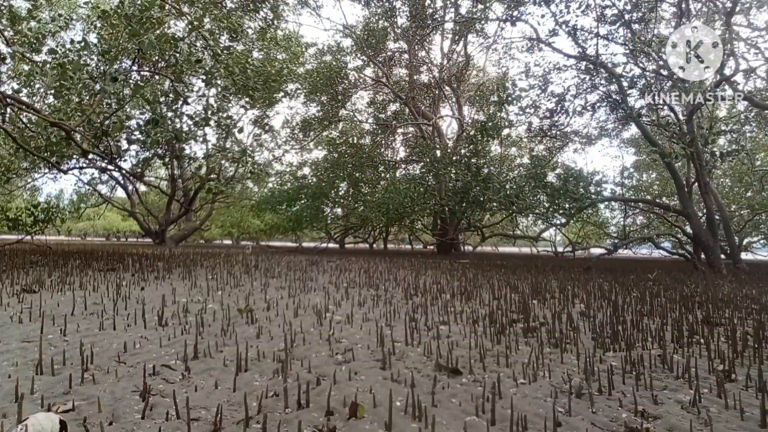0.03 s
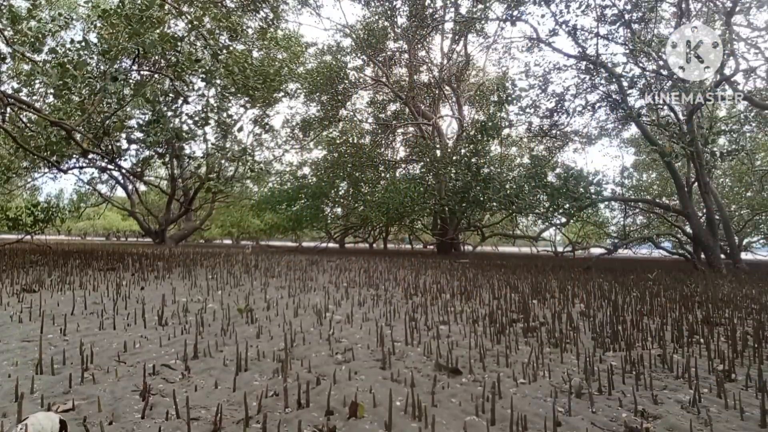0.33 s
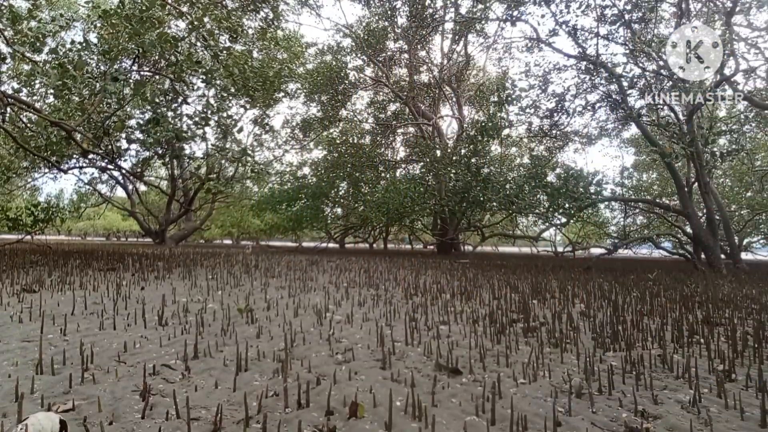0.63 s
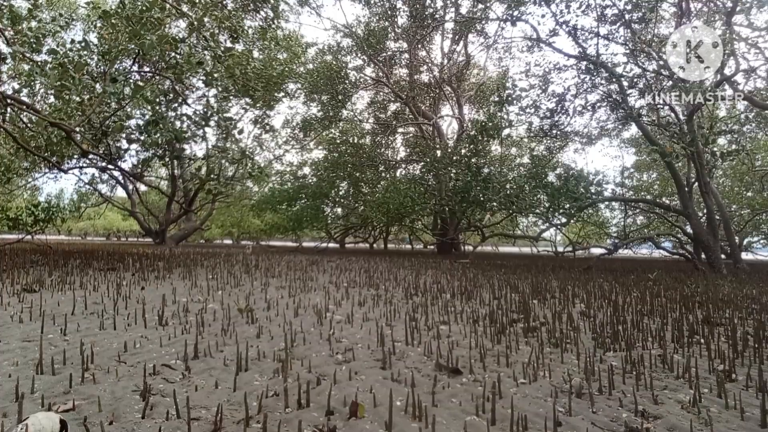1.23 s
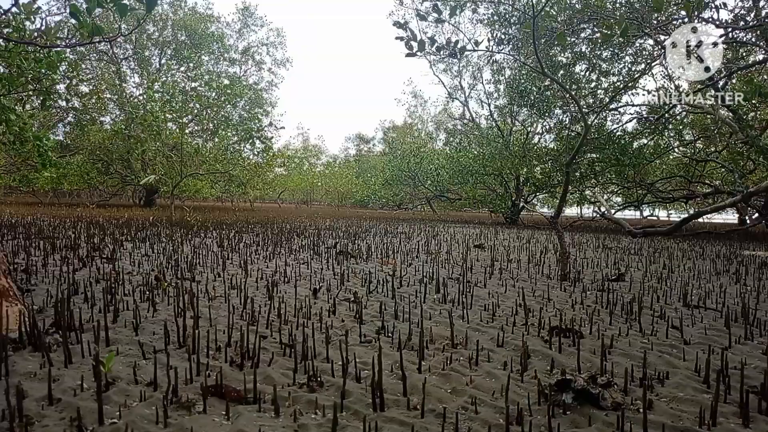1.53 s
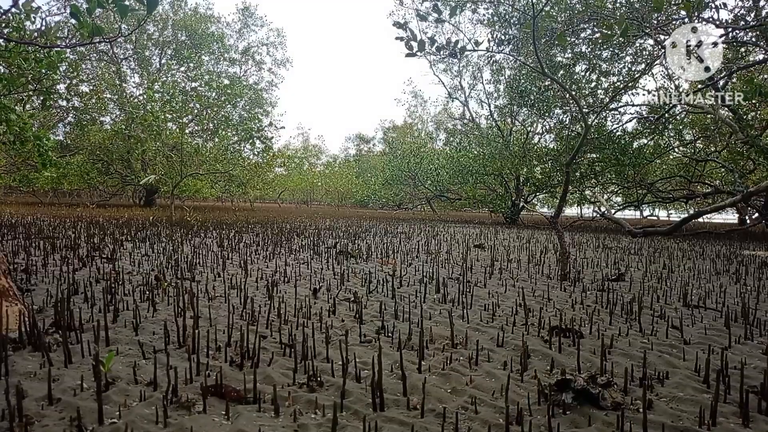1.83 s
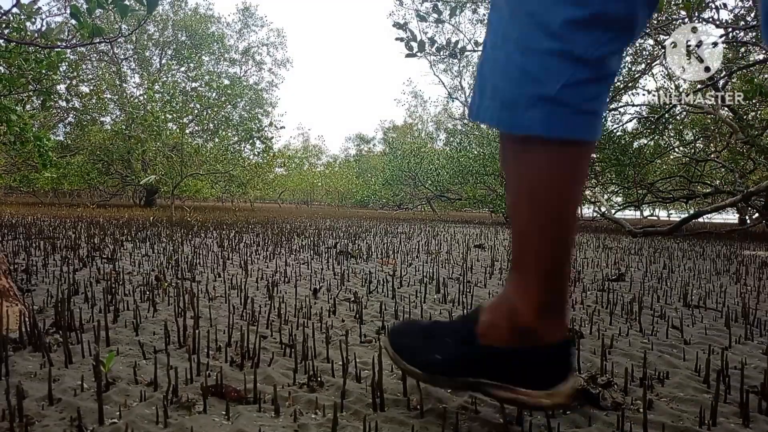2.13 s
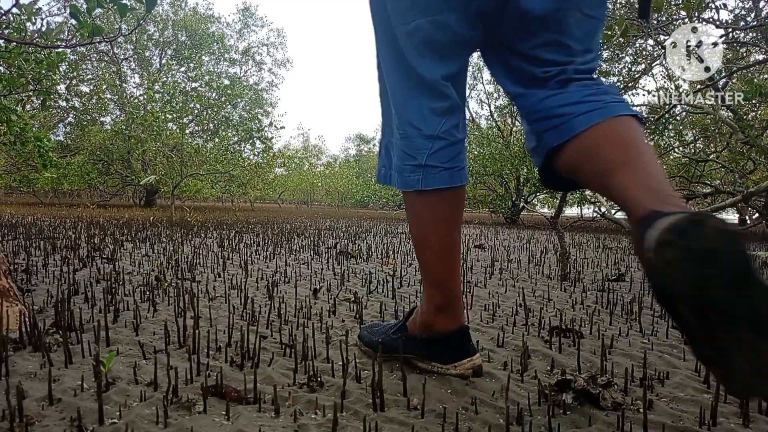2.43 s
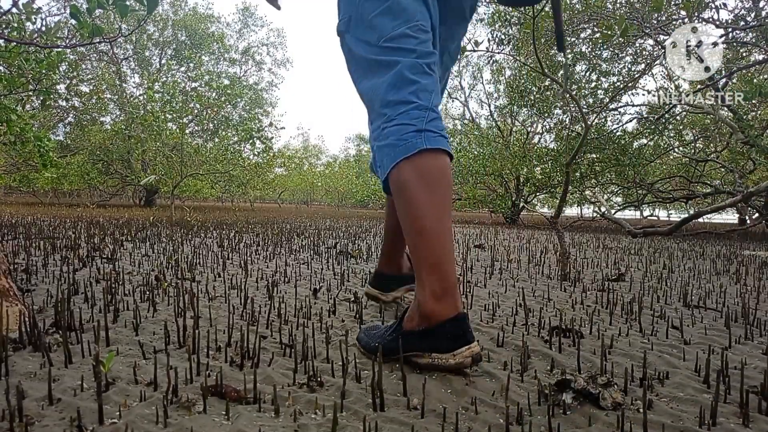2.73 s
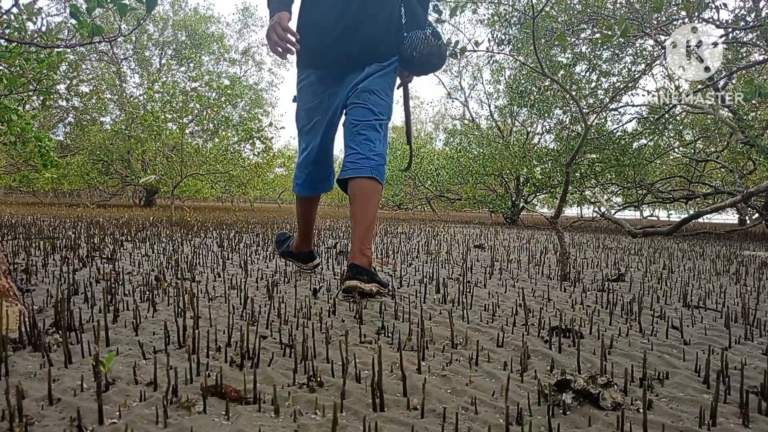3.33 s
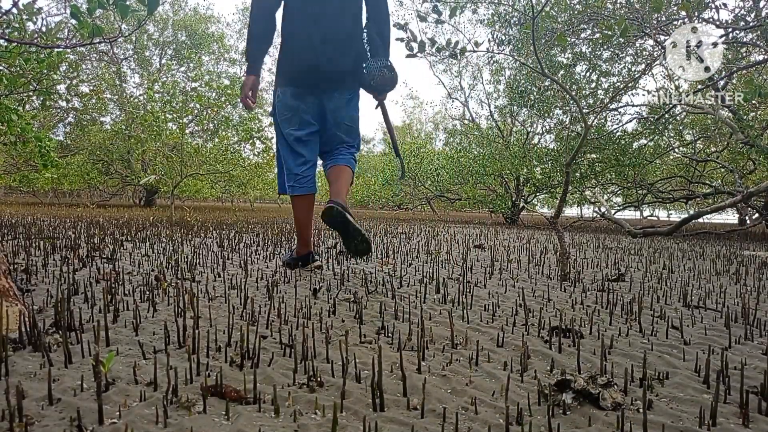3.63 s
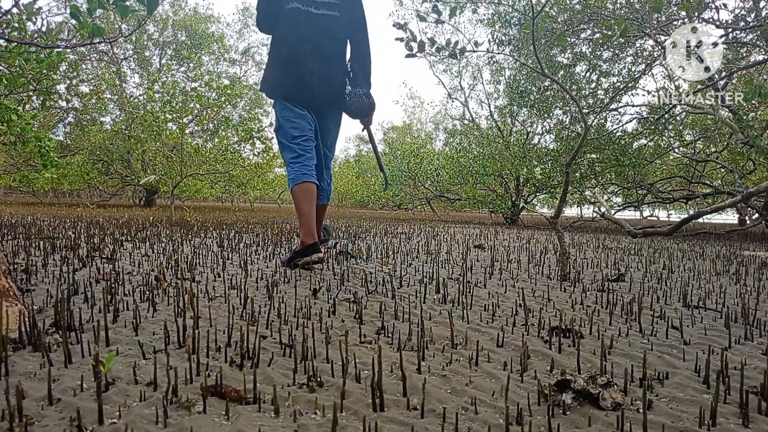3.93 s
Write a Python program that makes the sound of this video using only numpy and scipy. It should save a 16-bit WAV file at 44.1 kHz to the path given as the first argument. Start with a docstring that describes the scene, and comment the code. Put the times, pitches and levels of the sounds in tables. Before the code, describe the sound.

Footsteps crunch over gritty mud and recede, while light wind and a far engine rumble.

```python
"""A mangrove flat, with footsteps on wet sandy mud, first close by and then walking away.
Each sole crushes grit and sand, snaps small roots and shells and lands with a soft thud; water
fizzes back into the footprints. Low buffets and light wind reach the microphone, the firings of a
far boat engine ring its exhaust, and small birds call faintly over the hiss of open air.
The whole sound fades out briefly at about 1.6 s and returns."""
import sys
import numpy as np
from scipy import signal
from scipy.fft import rfft, irfft
from scipy.io import wavfile

SR = 44100
rng = np.random.default_rng(int(sys.argv[2]) if len(sys.argv) > 2 else 0)


def wav_out(sig):
    """Save sig, one row per channel (or a flat mono array), as 16-bit PCM at SR to the path in sys.argv[1]."""
    wavfile.write(sys.argv[1], SR, np.round(np.clip(np.atleast_2d(sig).T, -1, 1) * 32767).astype(np.int16))


N = 176400
TIME = np.arange(N) / SR


# Spectra of coarse grit and fine sand. Each row: frequency in Hz, relative spectral density in dB.
GRIT_SPECTRUM = [(200, -19.5), (400, -4.5), (700, 4), (1200, -2), (2000, -6.5), (3200, -11.5), (5000, -25),
                 (9000, -35)]
SAND_SPECTRUM = [(2000, 0.5), (3500, 6), (5500, -2.5), (8000, -6.5), (11000, -7), (16000, -11)]
# A sole presses, rolls or peels off. Each row: start in seconds, length in seconds, level in dB,
# boost of the sand in dB, pitch of the squelch in Hz.
SOLE_CONTACTS = [(0.018, 0.1, -57.5, -2.5, 2460), (0.13, .026, -48.5, -1, 1880),
                 (0.192, 0.015, -40.5, 4.5, 746), (0.243, 0.063, -43, -0.5, 785),
                 (0.306, 0.0092, -32.5, -4, 664), (0.329, 0.06, -35.5, 3.5, 2090),
                 (0.406, 0.034, -44, 1.5, 880), (0.451, 0.027, -43, -6.5, 2840),
                 (0.487, 0.042, -32.5, -2, 1700), (0.545, 0.017, -37, 6.5, 1650),
                 (0.603, 0.018, -59.5, 14, 1500), (1.711, 0.18, -52, 3, 1640),
                 (1.833, 0.039, -40.5, -9, 750), (1.887, 0.082, -47.5, 5, 1790),
                 (2.021, 0.011, -52, 6, 1760), (2.054, 0.12, -61.5, 1, 2040),
                 (2.172, 0.037, -38.5, -9, 1800), (2.247, 0.04, -40.5, 0, 1030),
                 (2.308, 0.042, -49.5, 4.5, 2160), (2.364, .04, -44.5, 1.5, 2260),
                 (2.409, 0.079, -49, 1.5, 1810), (2.506, 0.027, -41, -6, 724),
                 (2.557, 0.035, -77, -2.5, 1800), (2.764, 0.058, -44.5, -6, 900),
                 (2.829, 0.035, -44.5, -4.5, 860), (2.862, 0.075, -51, -2, 1150),
                 (2.975, 0.048, -45.5, -1.5, 1500), (3.035, 0.062, -48.5, 0.5, 2720),
                 (3.189, 0.026, -59, -6, 1820), (3.364, 0.15, -60, 6.5, 875), (3.401, 0.027, -38, -20, 725),
                 (3.546, 0.059, -52.5, 0, 2060), (3.672, .016, -58, 4, 1780),
                 (3.876, .027, -46.5, -4.5, 720), (3.928, 0.085, -57, 8, 1420)]

def crunches(rise_s=0.0062, decay_s=0.0087):
    """Granular fracture: grit and sand give way under load, and the wet pocket beneath resonates."""
    grit = grains(GRIT_SPECTRUM, per_s=2000, spread_db=3.5)
    sand = from_db(-9.5) * grains(SAND_SPECTRUM, per_s=7000, spread_db=1)
    out = np.zeros(N)
    for start, length, db, sand_db, hz in SOLE_CONTACTS:
        time_constants = np.maximum((start - TIME) / rise_s, (TIME - start - length) / decay_s)
        load = np.exp(-np.clip(time_constants, 0, 20))
        squelch = from_db(-9) * unit_rms(band(grit, hz, edge_ratio=1.22))
        out += from_db(db) * load * (unit_rms(grit + squelch) + from_db(sand_db) * sand)
    return out


def grains(spectrum, per_s, spread_db, clump_db=2, clump_hz=53):
    """Shot noise: tiny random fractures each ring briefly, and those of like pitch swell in clumps."""
    pitches = np.geomspace(spectrum[0][0], spectrum[-1][0], num=12)
    sizes = from_db(spread_db * np.minimum(rng.exponential(1, N), 3.3)) * rng.choice([-1, 1], N)
    clicks = sizes * (rng.random(N) < per_s / SR)
    pitch_index = rng.integers(0, len(pitches), N)
    out = np.zeros(N)
    for k, hz in enumerate(pitches):
        clumps = from_db(clump_db * wander(clump_hz))
        rings = band(clicks * clumps * (pitch_index == k), hz, edge_ratio=1.244)
        out += gain_at(spectrum, hz) * np.sqrt(hz) * unit_rms(rings)   # higher bands are wider
    return unit_rms(out)


# A root or shell breaks; the row at 1.3131 s is the break just before it, thrown back by the ground. Each row:
# start in seconds, peak of the body in dB, pitch in Hz, peak of the tick relative to the body in dB.
BREAKS = [(0.023, -41, 1220, -22), (.0445, -29, 1330, -13.5), (.148, -28, 1300, -6.5),
          (0.227, -36, 2500, 5.5), (0.247, -29, 1490, -16), (.264, -26, 1370, -10), (.311, -17, 1550, -15),
          (.319, -24, 1190, -19), (.386, -18.5, 990, -14.5), (.401, -19, 1120, -21), (.427, -21, 920, -23),
          (0.485, -33, 1600, -21), (0.505, -19.5, 1320, -10), (.776, -55.5, 9000, 15.5),
          (.903, -50, 8000, 4.5), (1.3119, -28, 2160, -17), (1.3131, -32, 1130, -27),
          (1.338, -46, 2000, -15), (1.387, -43.5, 3000, -10), (1.8329, -19.5, 970, -11),
          (1.8374, -15.5, 970, -13), (1.8469, -17.5, 1300, -7.5), (1.8522, -19, 1160, -15),
          (1.8576, -34, 1600, -14), (1.8765, -21, 1150, -6), (1.9274, -23.5, 1690, -9),
          (2.179, -18, 1570, -17), (2.199, -31.5, 1460, -2), (2.2305, -32, 2200, -18),
          (2.247, -19, 1400, -14), (2.2735, -21, 1900, -10), (2.3674, -24.5, 1770, -20),
          (2.451, -28.5, 1440, -14), (2.518, -27.5, 1090, -24), (2.532, -27.5, 1380, -17),
          (2.631, -31.5, 920, -35), (2.648, -43, 2470, 0), (2.756, -26.5, 1140, -18),
          (2.824, -24, 1030, -12.5), (2.9265, -30.5, 1930, -12), (2.976, -39.5, 2020, 0),
          (3.064, -30, 1760, -11.5), (3.275, -39, 2000, -28), (3.294, -36, 1180, -11.5),
          (3.35, -38, 1810, -25), (3.3996, -28, 720, -32), (3.42, -26, 1840, -24), (3.4224, -22, 1410, -25),
          (3.4253, -22.5, 1270, -28), (3.4291, -23.5, 1530, -18), (3.525, -34, 4200, -22),
          (3.894, -35, 1700, -26), (3.943, -28, 1730, -14.5)]

def snaps(tick_decay_s=0.0015):
    """Brittle fracture: sudden release gives one heavily damped swing with a bright tick on top."""
    out, t = np.zeros(N), TIME[:SR // 50]
    impulse = 1. * (t == 0)
    for start, db, hz, tick_db in BREAKS:
        body = butter(band(impulse, hz, edge_ratio=1.81), 1.7 * hz, "low")
        tick = butter(rng.standard_normal(len(t)), 4500, "high") * np.exp(-t / tick_decay_s)
        add(out, start, from_db(db) * (unit_peak(body) + from_db(tick_db) * unit_peak(tick)))
    return out


def scatter(steps, t60_s=0.29):
    """Diffuse reflection: roots and trees throw back a thin, dull, exponentially dying tail."""
    tail = butter(rng.standard_normal(SR), 4000, "low") * from_db(-60 * TIME[:SR] / t60_s)
    return from_db(-17.5) * signal.fftconvolve(steps, tail / np.linalg.norm(tail))[:N]


# Body weight lands on the mud, and buffets bump the microphone.
# Each row: centre in seconds, half-width in seconds, peak in dB, pitch in Hz.
WEIGHT_THUDS = [(.31, 0.015, -30, 235), (1.80, 0.016, -38, 82), (1.915, 0.011, -33, 90),
                (1.975, 0.013, -38, 86.6), (2.385, 0.015, -51.5, 75), (2.84, 0.027, -40.5, 191.9),
                (3.57, 0.043, -50, 76.4)]
MICROPHONE_BUFFETS = [(.015, 0.009, -29.5, 121), (.052, 0.013, -26, 115), (.077, 0.0086, -21.5, 115),
                      (.199, 0.0078, -20.5, 135), (.223, 0.0093, -18, 105), (.25, 0.023, -29, 130),
                      (.459, 0.014, -19, 105), (.51, 0.011, -23.5, 170), (.526, 0.012, -23.5, 105),
                      (.565, 0.008, -24.5, 110), (.61, 0.0094, -19, 105), (.72, 0.0077, -24.5, 125),
                      (.745, 0.028, -35.5, 80), (.89, 0.012, -18, 85), (.897, 0.013, -22.5, 150),
                      (.96, 0.013, -33.5, 105), (1.247, 0.018, -26.5, 90), (1.435, 0.0077, -31, 115)]

def low_bumps(pulses):
    """Wave packets: a thud or buffet is a few uneven low swings of pressure that swell and die."""
    out = np.zeros(N)
    uneven_time = np.cumsum(1 + 0.2436 * wander(122.7)) / SR
    for centre, half_width, db, hz in pulses:
        swings = np.sin(2 * np.pi * (hz * uneven_time + rng.random()))
        out += from_db(db) * swell(centre, half_width) * swings
    return butter(out, 39, "high")


# The mud ticks as it settles. Each row: time in seconds, level in dB.
SETTLING_LEVEL = [(0, -70.5), (.65, -74), (.9, -71), (1.1, -74.5), (1.5, -86), (1.8, -72), (2.6, -80.5),
                  (3.2, -74), (4, -77)]
# Water refills a footprint. Each row: centre in seconds, half-width in seconds, pitch in Hz, level in dB.
FOOTPRINT_SEEPS = [(0.67, 0.044, 1960, -60.5), (0.724, 0.077, 3510, -70.5), (.87, .055, 3180, -64.5),
                   (.88, 0.056, 3950, -69), (0.97, 0.11, 3560, -70.5)]

def wet_mud():
    """Shot noise and narrow-band noise: settling mud ticks sparsely and seeping water fizzes."""
    out = gain_curve(SETTLING_LEVEL) * grains(SAND_SPECTRUM, per_s=550, spread_db=5)
    white = rng.standard_normal(N)
    for centre, half_width, hz, db in FOOTPRINT_SEEPS:
        fizz = unit_rms(band(white, hz, edge_ratio=1.044))
        out += from_db(db) * swell(centre, half_width) * fizz
    return out


# Engine speed. Each row: time in seconds, firings per second.
FIRING_RATE = [(0, 26.2), (1.6, 26.2), (1.7, 26.7), (3.35, 26.7), (4, 26.2)]
# The puff of one firing. Each row: frequency in Hz, relative spectral density in dB.
PUFF_SPECTRUM = [(60, -18), (130, -6), (220, -7), (330, -0.5), (520, -10), (800, -12.5), (1500, -34),
                 (4000, -32), (8000, -66)]
# Exhaust resonances. Each row: frequency in Hz, drive in dB, time to fall by 60 dB in seconds.
EXHAUST_MODES = [(112, -53.5, 0.046), (150, -39.5, .1), (185, -49.5, 0.085), (287.3, -43, 0.095),
                 (338.2, -47.5, 0.099), (490, -48.5, 0.11)]
# The engine grows louder and softer. Each row: time in seconds, gain in dB.
ENGINE_GAIN = [(0, 0), (1.0, -2), (1.5, -3), (1.8, -1.5), (2.4, 2.5), (3.2, 1), (4, -2.5)]

def boat_engine(jitter_s=0.0003, spread_db=1.3, puff_decay_s=0.015):
    """Impulse excitation: each firing sends out a pressure swing and a puff, and rings the exhaust."""
    cycles = np.cumsum(np.interp(TIME, *np.transpose(FIRING_RATE))) / SR
    firings = np.zeros(N)
    for start in 0.036 + np.interp(np.arange(int(cycles[-1])), cycles, TIME):
        add(firings, start + jitter_s * rng.normal(), from_db([spread_db * rng.normal()]))
    chuff = butter(butter(firings, [90, 345], "band"), 476, "low")
    puff_envelope = signal.lfilter([1], [1, -np.exp(-1 / (puff_decay_s * SR))], firings)
    out = from_db(-36.5) * unit_peak(chuff) + from_db(-46.5) * noise(PUFF_SPECTRUM) * puff_envelope
    for hz, db, t60 in EXHAUST_MODES:
        radius, angle = from_db(-60 / (t60 * SR)), 2 * np.pi * hz / SR
        drive = firings * from_db(db + spread_db * rng.standard_normal(N))
        out += signal.lfilter([.5, 0, -.5], [1, -2 * radius * np.cos(angle), radius ** 2], drive)
    out = butter(out, 70, "high")
    muffled = butter(butter(out, 774, "low"), 950, "low")
    return gain_curve(ENGINE_GAIN) * muffled


# Bird calls. Each row: start in seconds, length in seconds, first and last pitch in Hz, peak in dB.
WHISTLES = [(1.11, 0.031, 7300, 6800, -78), (1.235, .04, 7300, 7200, -87), (1.435, 0.021, 7400, 7100, -75),
            (3.638, .2, 5600, 6100, -69.5), (3.707, 0.17, 6400, 6730, -75)]

def birds():
    """Frequency modulation: each far whistle is a thin tone that glides and wavers at random."""
    out = np.zeros(N)
    waver_hz = 254 * wander(cutoff_hz=500)
    for start, length, first_hz, last_hz, db in WHISTLES:
        progress = np.clip((TIME - start) / length, 0, 1)
        pitch = first_hz + (last_hz - first_hz) * progress + waver_hz
        envelope = np.sqrt(abs(np.sin(np.pi * progress)))
        out += from_db(db) * envelope * np.sin(2 * np.pi * np.cumsum(pitch) / SR)
    return out


# Spectra of the wind and the open air. Each row: frequency in Hz, relative spectral density in dB.
WIND_SPECTRUM = [(20, -38), (40, -24), (70, -4), (130, 1.5), (250, -7.5), (500, -18.5), (1500, -41),
                 (4000, -76.5)]
AIR_SPECTRUM = [(100, -2.5), (600, 3), (1200, -3), (2500, -10.5), (4000, -15.5), (6000, -23.5),
                (10000, -29), (16000, -27.5)]
# Their slow rise and fall. Each row: time in seconds, gain in dB.
WIND_GAIN = [(0, 3), (.9, -0.5), (1.5, -1.5), (2.0, 1), (2.4, -2.5), (2.7, -3.5), (3.3, -1.5), (3.55, 1),
             (4, 0.5)]
AIR_GAIN = [(0, 5.5), (1.5, -3.5), (2.1, 1.5), (3.2, 1), (3.8, -2.5)]

def wind_and_air():
    """Broadband noise: light wind rumbles on the microphone over the faint hiss of open air."""
    rumble = from_db(-43.5) * gain_curve(WIND_GAIN) * noise(WIND_SPECTRUM)
    hiss = from_db(-59) * gain_curve(AIR_GAIN) * noise(AIR_SPECTRUM)
    return rumble + hiss


def from_db(db):
    """Decibels as an amplitude ratio."""
    return 10 ** (np.asarray(db) / 20)


def unit_rms(x):
    """Normalisation to unit power."""
    return x / np.sqrt(np.mean(x ** 2) + 1e-20)


def unit_peak(x):
    """Normalisation to a peak of one."""
    return x / abs(x).max()


def gain_curve(rows):
    """Gain at every sample, interpolated in decibels."""
    return from_db(np.interp(TIME, *np.transpose(rows)))


def gain_at(spectrum, hz):
    """Gain of a spectrum, interpolated on a log-frequency axis."""
    frequencies, db = np.transpose(spectrum)
    return from_db(np.interp(np.log(hz + 1), np.log(frequencies), db))


def butter(x, hz, kind):
    """Second-order Butterworth filter."""
    sections = signal.butter(2, np.clip(hz, 10, .48 * SR), kind, fs=SR, output="sos")
    return signal.sosfilt(sections, x + 1e-18)


def band(x, hz, edge_ratio):
    """Band-pass filter about a geometric centre."""
    return butter(x, [hz / edge_ratio, hz * edge_ratio], "band")


def noise(spectrum):
    """Spectrally shaped noise of unit power."""
    gains = gain_at(spectrum, np.fft.rfftfreq(N, 1 / SR))
    return unit_rms(irfft(rfft(rng.standard_normal(N)) * gains, N))


def wander(cutoff_hz):
    """Low-pass random fluctuation of unit power."""
    return unit_rms(butter(rng.standard_normal(N), cutoff_hz, "low"))


def swell(centre, half_width):
    """Gaussian envelope, down to 1/e at a half-width from its centre."""
    return np.exp(-np.minimum(((TIME - centre) / half_width) ** 2, 20))


def add(out, start_s, sound):
    """Superposition of a sound from a given time."""
    i = int(np.clip(start_s * SR, 0, N))
    out[i:i + len(sound)] += sound[:N - i]


def scene():
    """Superposition: the walker sounds in front of the boat, the birds and the open air."""
    steps = crunches() + snaps()
    bumps = low_bumps(WEIGHT_THUDS) + low_bumps(MICROPHONE_BUFFETS)
    background = boat_engine() + birds() + wind_and_air()
    return (steps + scatter(steps) + wet_mud() + bumps + background)[None]


# Peaks and a notch in the microphone's treble. Each row: frequency in Hz, gain in dB, quality factor.
MICROPHONE_RESPONSE = [(9260, 10.5, 4.1), (12100, -17, 2.55), (15450, 6.5, 7)]
# The level dips briefly to near silence. Each row: time in seconds, gain in dB.
LEVEL_DIP = [(1.49, -1), (1.545, -9), (1.575, -11), (1.59, -64.5), (1.70, -62), (1.715, -18), (1.75, -9.5),
             (1.81, -3)]

def record(dry, cutoff_hz=15900):
    """Linear filtering and gain: the microphone's uneven treble, a brief dip and a steep top cut."""
    for hz, db, q in MICROPHONE_RESPONSE:
        angle, root_gain = 2 * np.pi * hz / SR, from_db(db / 2)
        damping = np.sin(angle) / (2 * q)
        numerator = [1 + damping * root_gain, -2 * np.cos(angle), 1 - damping * root_gain]
        denominator = [1 + damping / root_gain, -2 * np.cos(angle), 1 - damping / root_gain]
        dry = signal.lfilter(numerator, denominator, dry)
    top_cut = signal.ellip(10, .3, 80, cutoff_hz, fs=SR, output="sos")
    return signal.sosfilt(top_cut, dry * gain_curve(LEVEL_DIP))


dry = scene()
out = record(dry)
wav_out(out)
```